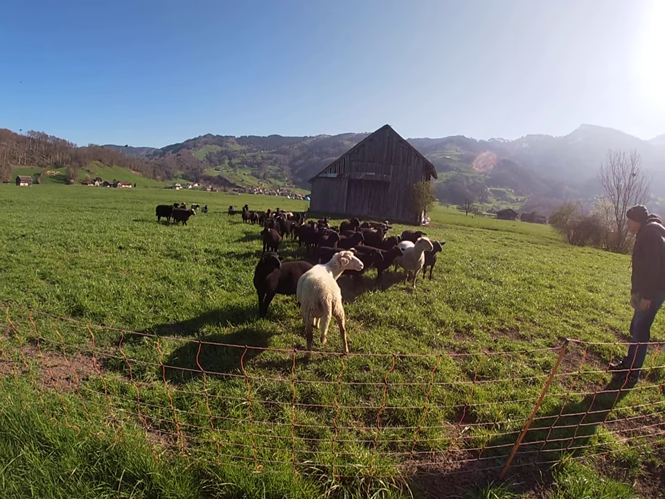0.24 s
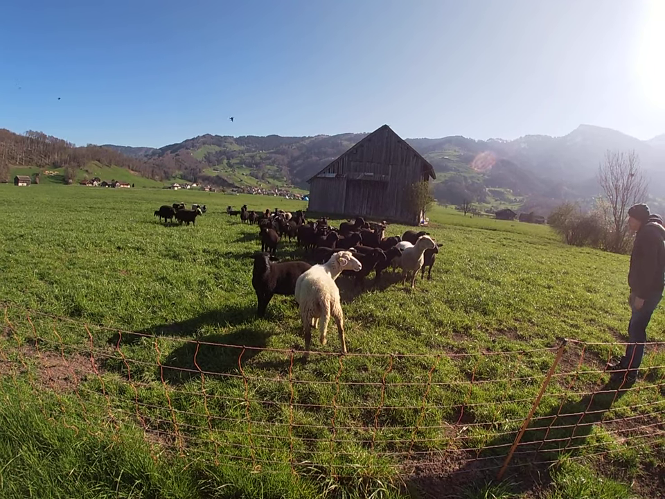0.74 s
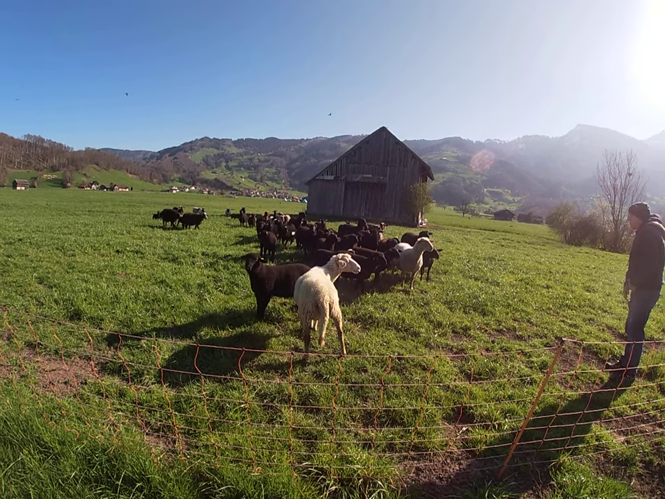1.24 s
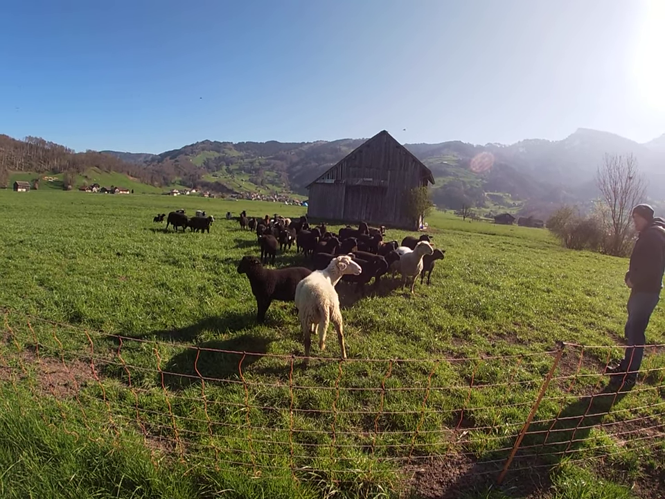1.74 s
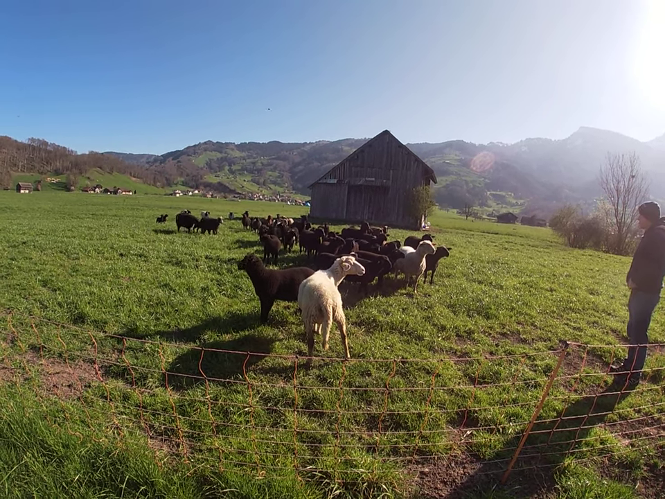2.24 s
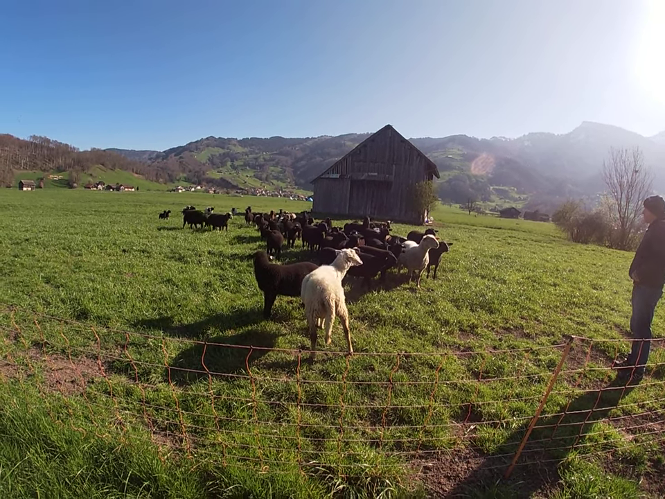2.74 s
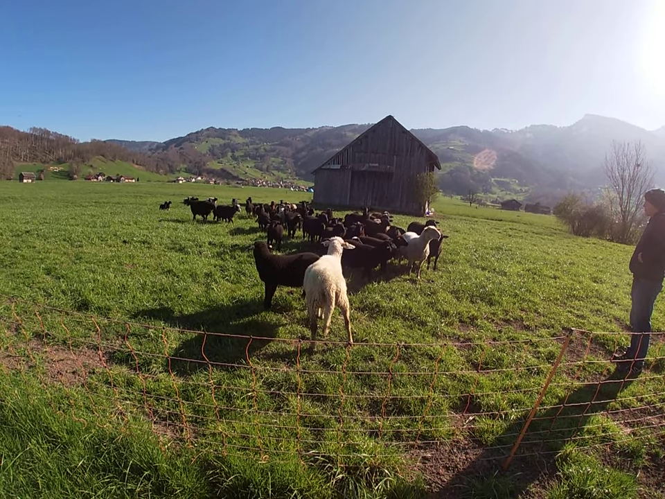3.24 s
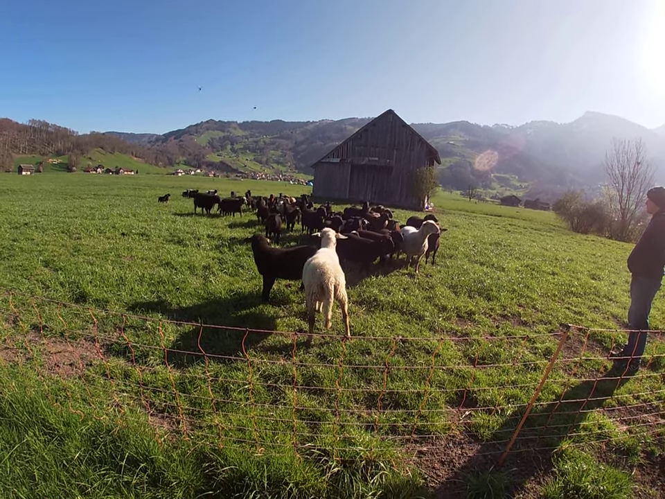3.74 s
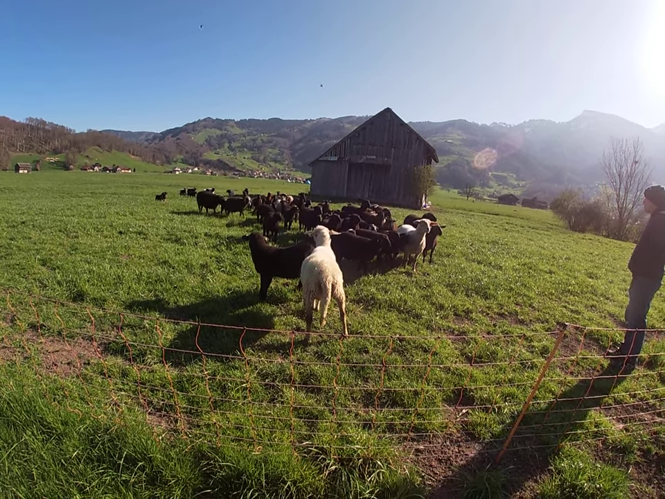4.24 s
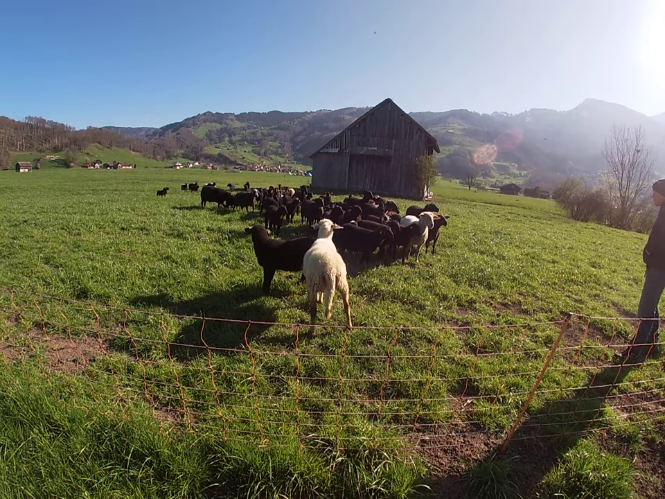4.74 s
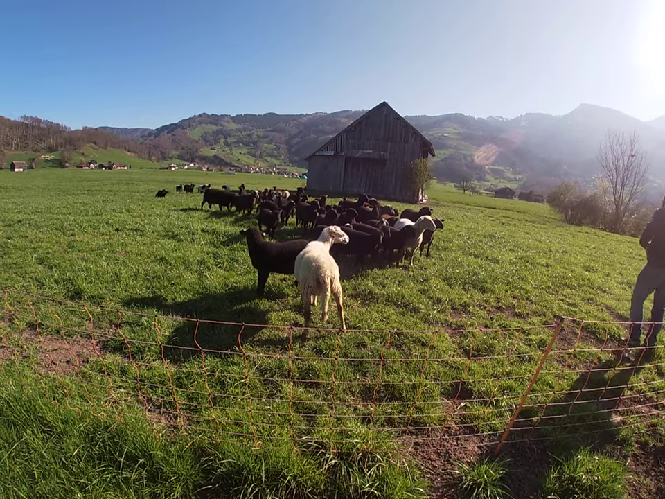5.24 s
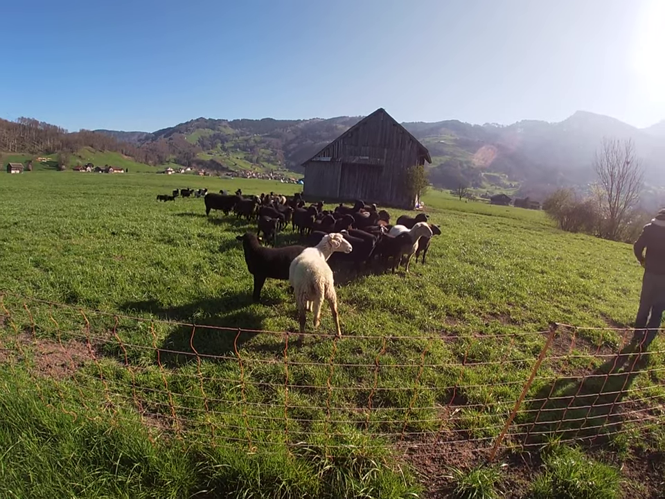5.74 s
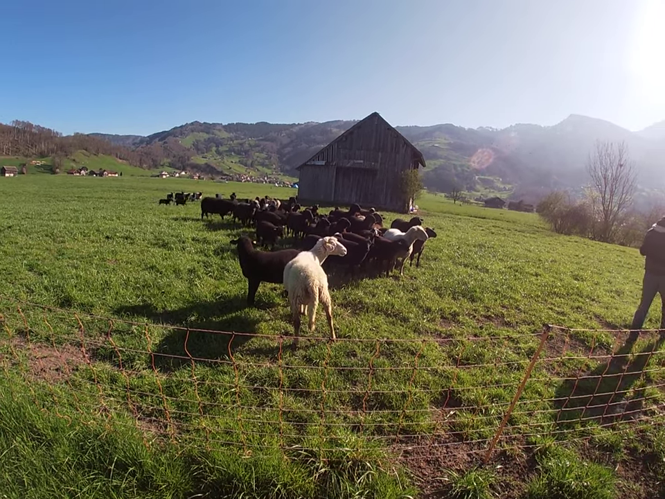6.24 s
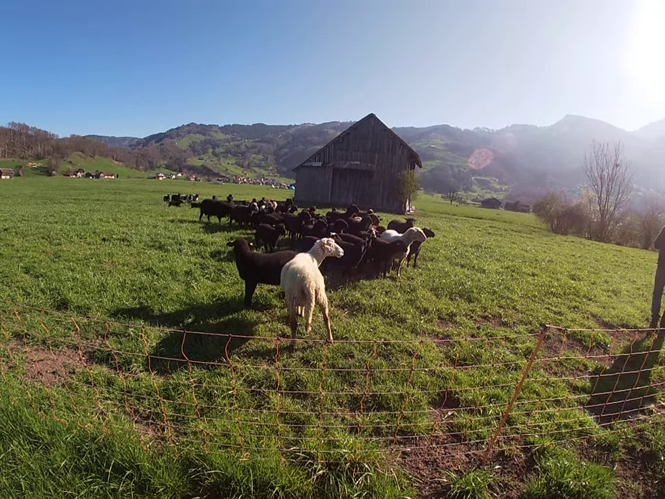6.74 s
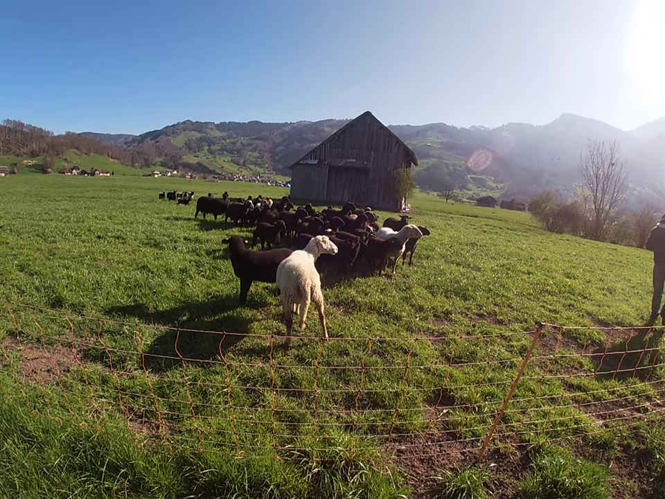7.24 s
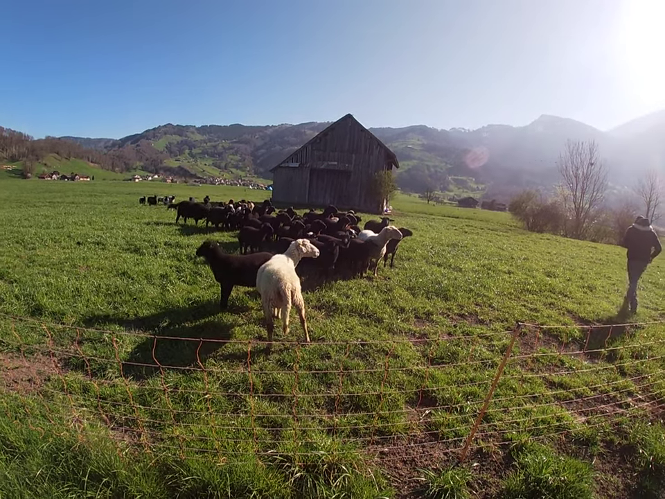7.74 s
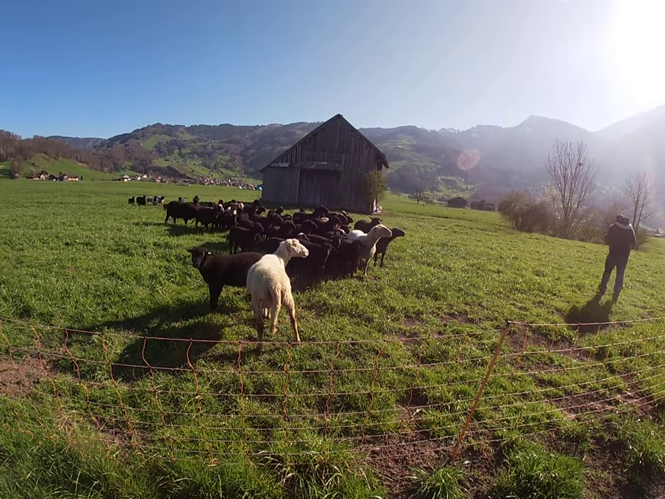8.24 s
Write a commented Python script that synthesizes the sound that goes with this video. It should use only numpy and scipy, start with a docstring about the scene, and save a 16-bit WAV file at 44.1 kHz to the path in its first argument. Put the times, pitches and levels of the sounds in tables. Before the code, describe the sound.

Open pasture, slightly wind-buffeted microphone. A high lamb bleats first, then a cluster of fainter quavering calls, a loud bright lamb, and two low ewes overlapping, one hoarse and one clear. After a pause of birdsong and faint grass rustle, a near ewe starts with a muffled closed-mouth stutter and opens into a strong nasal baa. Small birds rasp and whistle throughout.

```python
"""Light wind buffets the microphone over soft open-air hiss and a faint valley hum; grass swishes and ticks.
Small birds rasp (harsh chains of falling sweeps) and whistle (pure glides) overhead.
Lambs and ewes bleat by turns over an open pasture, one call overlapping the next: vocal-fold pulses
and breath turbulence ring through throat resonances. Wind and grass are shaped noise, the hum is wavering sines."""
import sys
import numpy as np
from scipy import signal
from scipy.fft import rfft, irfft, next_fast_len
from scipy.io import wavfile
from scipy.ndimage import map_coordinates

SR = 44100
rng = np.random.default_rng(int(sys.argv[2]) if len(sys.argv) > 2 else 0)


def output_pcm(signal):
    """Save a mono or channel-first signal as 16-bit PCM at the path in sys.argv[1].

    Samples are clipped to [-1, 1] before scaling.
    """
    pcm = np.clip(np.atleast_2d(signal).T, -1, 1) * 32767
    wavfile.write(sys.argv[1], SR, np.round(pcm).astype(np.int16))


N = 374850
TIME = np.arange(N) / SR

# Bleats by name: start_s, summit_s, end_s, summit_pitch_hz, rise_share, droop_share, level_db (above 500 Hz),
# attack_s, sag_db_per_s, release_s
BLEATS = { "lamb": (.435, .71, 1.06, 434.5, .046, .088, -40, .04, 11, .04),
          "far lamb": (1.71, 1.93, 2.12, 374, .06, .032, -44.5, .45, 0, .01),
          "young ewe": (2.04, 2.32, 2.44, 165, .28, .06, -41.3, .2, 14, .05),
          "answering ewe": (2.415, 2.465, 2.6, 164, .06, .2, -43, .03, 60, .03),
          "low stutter": (2.5, 2.71, 2.73, 269, .125, .06, -45, .01, 10, .01),
          "high stutter": (2.75, 2.77, 2.97, 270, .06, .01, -41, .02, 20, .01),
          "loud lamb": (3.345, 3.544, 3.83, 398.5, .125, .074, -34.2, .105, 42, .03),
          "hoarse ewe": (3.81, 4.06, 4.43, 136, .1, .06, -39.3, .08, 7, .11),
          "clear ewe": (4.25, 4.6, 5.0, 166.8, .105, .128, -40.6, .08, 0, .085),
          "far ewe": (6.12, 6.38, 6.48, 150, .23, .06, -57, .1, 0, .01),
          "near ewe, mouth shut": (6.45, 6.83, 6.95, 178, .12, 0, -39.5, .075, 7, .01),
          "near ewe, lips parting": (6.915, 6.935, 6.975, 179, 0, .12, -35.5, .012, 0, .02),
          "near ewe, mouth open": (6.952, 7.08, 7.32, 171.5, 0, .135, -32.6, .04, 12, .13)}


def amp(db):
    """Decibels to gain."""
    return 10 ** (np.asarray(db) / 20)


def unit(x):
    """Scale to rms 1."""
    return x / np.sqrt(np.mean(x ** 2) + 1e-20)


def along(points, hz):
    """Interpolate (hz, value) points on a log-frequency axis."""
    f, v = np.transpose(points)
    return np.interp(np.log(hz + 1), np.log(f + 1), v)


def curves(rows, t):
    """Interpolate each column after the time column at times t."""
    s, *cols = np.transpose(rows)
    return [np.interp(t, s, c) for c in cols]


def wobble(rate_hz, size=N):
    """Smooth random curve with rate_hz random knots a second."""
    knots = rng.standard_normal(int(size * rate_hz / SR) + 4)
    return map_coordinates(knots, [np.arange(size) * rate_hz / SR], mode="nearest")


def filtered(x, response):
    """Multiply the spectrum of x by response(hz)."""
    m = next_fast_len(len(x) + 8192)
    return irfft(rfft(x, m) * response(np.fft.rfftfreq(m, 1 / SR)), m)[:len(x)]


def noise(spectrum):
    """Coloured noise of rms 1; spectrum is (hz, db) points."""
    return unit(filtered(rng.standard_normal(N), lambda hz: amp(along(spectrum, hz))))


def add(out, s, x):
    """Mix x into out at time s."""
    part = out[max(round(s * SR), 0):][:len(x)]
    part += x[:len(part)]


def wind(rumble_db=0.3, lumps_db=4.4, buffet_db=-2):
    """Eddies roll over the microphone, fluttering more in a flurry; the sharpest land as single soft thumps."""
    # Wind strength: time_s, strength_db
    wind_strength = [(0.0, -34.0), (0.15, -42.0), (0.65, -35.0), (1.72, -53.0), (1.97, -39.0),
                     (3.03, -41.0), (3.16, -47.0), (3.3, -28), (3.65, -39.0), (3.75, -32.0), (4.6, -42.0),
                     (4.85, -35.0), (6.7, -31.0), (6.96, -43.0), (7.08, -31.0), (8.4, -45.0)]
    # Flutter relative to strength: time_s, flutter_db
    flutter_share = [(.7, -17), (1.2, -10.5), (2.7, -8), (3.9, -9), (4.6, -14.5), (8.4, -15)]
    # Spells of fast eddies: middle_s, length_s, level_db
    flurries = [(3.04, .07, -36), (3.45, .3, -42.5), (6.6, .36, -43)]
    # Sharp eddies: time_s (half a cycle before the peak), peak_db (before buffet_db), pitch_hz
    buffets = [(2.009, -21, 55), (3.041, -21, 100), (3.327, -16.5, 40.7), (3.389, -11.5, 75.6),
               (3.434, -20.5, 72.7), (4.062, -18, 66), (6.493, -16.5, 53.3)]
    # Slow-eddy spectrum: freq_hz, level_db
    rumble_spectrum = [(10, -18), (35, 0.5), (80, -7), (120, -20.5), (400, -81)]
    # Fast-eddy spectrum: freq_hz, level_db
    flutter_spectrum = [(50, -52), (105, -3), (170, -6), (330, -25.5), (1200, -74)]

    strength_db, = curves(wind_strength, TIME)
    flutter_db, = curves(flutter_share, TIME)
    eddies = wobble(22)
    rumble = unit(noise(rumble_spectrum) * amp(0.53 * lumps_db * eddies))
    flutter = unit(noise(flutter_spectrum) * amp(lumps_db * eddies))
    flurry = sum(amp(db) * np.exp(-(2 * (TIME - s) / length) ** 4) for s, length, db in flurries)
    out = amp(strength_db + rumble_db) * rumble
    out += (amp(strength_db + flutter_db) + flurry) * flutter
    for s, db, hz in buffets:
        turn = np.linspace(-1, 1, int(2 * SR / hz))  # two cycles
        thump = np.cos(2 * np.pi * turn) * np.cos(np.pi * turn / 2) ** 4
        add(out, s - .5 / hz, amp(db + buffet_db) * thump)
    return out


def valley(air_db=-61):
    """Soft open-air hiss of coloured noise and a faint hum of sines wavering in pitch and level."""
    # Hum tones: freq_hz, level_db
    hum_tones = [(176, -58.5), (350, -70.5)]
    # Hiss spectrum: freq_hz, level_db
    air_spectrum = [(200, -2), (430, -9), (555, -12.5), (768, -5.5), (2400, -15), (5800, -18), (6850, -29),
                    (9000, -68)]

    out = np.zeros(N)
    for hz, db in hum_tones:
        level = amp(db + wobble(3))
        out += level * np.sin(2 * np.pi * np.cumsum(hz * (1 + 0.01204 * wobble(11))) / SR)
    return out + amp(air_db + 2.1 * wobble(4.134)) * noise(air_spectrum)


def grass(grain_db=3, tick_t60_s=0.015, tick_db=-8):
    """Blades brush in grainy swishes of noise; a dry stalk snaps here and there as a short band of noise."""
    # Swish level: time_s, level_db
    swish_level = [(0, -76), (.95, -59), (1.2, -68), (5.6, -59), (5.78, -63), (6.4, -67), (8.3, -70.5),
                   (8.45, -57)]
    # Swish spectrum: freq_hz, level_db
    swish_spectrum = [(1000, -2), (3500, -3), (6000, -4), (10000, -17), (13000, -45)]
    # Dry stalks: start_s, peak_db (before tick_db), centre_hz
    ticks = [(5.0548, -29, 5880), (7.7294, -37, 3030)]

    swish = unit(noise(swish_spectrum) * amp(grain_db * wobble(500)))
    out = amp(curves(swish_level, TIME)[0]) * swish
    t = np.arange(SR // 20) / SR
    for s, db, centre in ticks:
        burst = rng.standard_normal(len(t)) * amp(-60 * t / tick_t60_s)
        snap = filtered(burst, lambda hz: 1 / (1 + ((hz - centre) / (0.34 * centre)) ** 2))
        add(out, s, amp(db + tick_db) * snap / np.abs(snap).max())
    return out


def rasp_notes(first_rasp_db=-2):
    """Unroll runs into even notes, add far birds at random: (start_s, length_s, level_db, pitch_hz, harsh)."""
    # Runs of rasps: start_s, notes, spacing_s, length_s, level_db, pitch_hz, harshness (0-1)
    rasp_runs = [(1.483, 1, 0, .049, -50, 2750, .3), (1.559, 2, .077, .032, -47.5, 2800, .85),
                 (1.833, 3, .059, .032, -49.5, 2800, .9), (2.177, 4, .084, .036, -47, 2750, .9),
                 (2.88, 1, 0, .42, -47.5, 2700, .6), (2.985, 1, 0, .135, -42, 2700, .35),
                 (3.122, 2, .04, .03, -45, 2650, .5), (3.232, 5, .076, .046, -43.5, 2600, .6),
                 (3.995, 1, 0, .069, -54, 2000, .6), (5.051, 1, 0, .13, -46, 1900, .5),
                 (5.271, 2, .22, .07, -55, 1800, .25), (5.9, 1, 0, .09, -55, 1750, .3),
                 (7.45, 3, .07, .06, -58.5, 1750, .35), (8.14, 2, .075, .04, -56, 1700, .3)]
    far_per_s, far_s, far_db, far_hz = 4, .05, -67, 2300  # far birds: rate, middle length, level, middle pitch

    notes = []
    for s, count, spacing, length, db, hz, harsh in rasp_runs:
        for k in range(round(count)):
            # a run starts softly
            notes.append((s + k * spacing, length, db + first_rasp_db * (k == 0), hz, harsh))
    for when, long, high in rng.random((int(far_per_s * N / SR), 3)):
        notes.append((when * N / SR, far_s * (.5 + long), far_db, far_hz * 2 ** ((high - .5) / 2), 1))
    return notes


def whistle_notes():
    """Each whistle is one phrase of upstrokes, a high arch and a lower answer; columns as the phrase."""
    # Whistles: start_s, level_db
    whistles = [(.891, -47.5), (4.535, -50.5), (5.868, -54), (8.034, -51.5)]
    # Phrase: delay_s, length_s, start_hz, middle_hz, end_hz, level_db (relative to the whistle)
    phrase = [(-.022, .022, 4800, 5350, 6000, -10), (0, .042, 3400, 4680, 3450, 0),
              (.051, .015, 4100, 5100, 6100, -8), (.06, .025, 2850, 3100, 3950, -2),
              (.081, .019, 3600, 3120, 2900, -2)]
    return [(s + delay, *note, db + note_db) for s, db in whistles for delay, *note, note_db in phrase]


def rasp(length, hz, harsh, unsteady=.025, wander=.05, overtone_db=(-8, 0, -24)):
    """Chain of falling sweeps with overtones, made harsh by phase buzz at a quarter of the pitch."""
    sweeps_per_s, sweep_fall = 75, .2  # mean rate; fall as a share of hz
    size = int(length * SR)
    fall = np.cumsum(sweeps_per_s * (1 + .5 * wobble(150, size))) / SR % 1
    drift = unsteady * wobble(600, size) + wander * wobble(120, size)
    pitch = hz * (1 + sweep_fall * (1 / 3 - fall ** 2) + drift)
    phase = 2 * np.pi * np.cumsum(pitch) / SR
    phase = phase + harsh * (np.sin(phase / 4) + .27 * wobble(2200, size))
    tone = sum(amp(level) * np.sin(k * phase) for k, level in enumerate(overtone_db, 1))
    swell = np.sqrt(np.sin(np.pi * fall)) * amp(3 * wobble(2 * sweeps_per_s, size))
    return unit(tone * swell) * signal.windows.tukey(size, .4)


def whistle(length, start, middle, end):
    """Pure tone gliding on a parabola through three pitches, slightly unsteady."""
    size = int(length * SR)
    glide = np.polyfit([0, .5, 1], [start, middle, end], 2)
    pitch = np.polyval(glide, np.linspace(0, 1, size))
    phase = 2 * np.pi * np.cumsum(pitch * (1 + .015 * wobble(700, size))) / SR
    return unit(np.sin(phase) * signal.windows.tukey(size, .5))


def birds():
    """Small birds: harsh rasps near and far, and whistled phrases."""
    out = np.zeros(N)
    for s, length, db, hz, harsh in rasp_notes():
        add(out, s, amp(db) * rasp(length, hz, harsh))
    for s, length, start, middle, end, db in whistle_notes():
        add(out, s, amp(db) * whistle(length, start, middle, end))
    return out


def contour(name, t):
    """Pitch arches over a summit, level_db swells, sags and fades; both drop briefly where the voice catches."""
    # Catches: bleat name, time_s, pitch_drop_share
    catches = [("lamb", .438, .155), ("lamb", .49, .1), ("lamb", .935, .025), ("loud lamb", 3.352, .17),
               ("loud lamb", 3.407, .085), ("clear ewe", 4.935, .035), ("near ewe, mouth shut", 6.533, .2),
               ("near ewe, mouth shut", 6.895, .04), ("near ewe, mouth open", 6.975, .08)]
    arch = 1.5  # roundness of the summit (1 = pointed)
    attack_db, release_db = 8, 16  # depth of swell in and fade out
    catch_s, catch_power = .024, 3  # half width; loudness follows this power of the pitch

    start, summit, end, hz, rise, droop, db, attack, sag, release = BLEATS[name]
    before = np.interp(t, [start, summit], [1, 0])
    after = np.interp(t, [summit, end], [0, 1])
    catch = 1 - sum(drop * np.exp(-((t - s) / catch_s) ** 2) for who, s, drop in catches if who == name)
    pitch = hz * (1 - rise * before ** arch - droop * after ** arch) * catch
    fade_in_db = np.interp(t, [start, start + attack], [attack_db, 0])
    fade_out_db = np.interp(t, [end - release, end], [0, release_db])
    sag_db = sag * np.maximum(t - start - attack, 0)
    return pitch, db - fade_in_db - fade_out_db - sag_db + catch_power * 20 * np.log10(catch)


def pulses(times, sizes, size):
    """Sharp pulses at fractional sample times, by windowed sinc."""
    index = np.floor(times)[:, None] + np.arange(-7, 9)
    lag = index - times[:, None]
    shape = np.sinc(lag) * np.cos(np.pi * lag / 16) ** 2
    where = np.clip(index, 0, size - 1).astype(int)
    return np.bincount(where.ravel(), (sizes[:, None] * shape).ravel(), size)


def resonate(x, throat, size=4096):
    """Causal throat colour: each pulse rings on after it strikes; treble falls away past the last point."""
    hz = np.fft.rfftfreq(size, 1 / SR)
    damping = along([(f, amp(-db / 2)) for f, db in throat], hz)  # pointed resonances, broad valleys
    treble_loss = 1 + (hz / throat[-1][0]) ** 8
    bass_loss = 1 + (90 / (hz + 1)) ** 2
    gain = damping ** -2 / treble_loss / bass_loss
    # folded cepstrum gives minimum phase
    cepstrum = irfft(np.log(np.maximum(gain, 3e-4)))
    fold = np.r_[1, np.full(size // 2 - 1, 2), np.zeros(size // 2)]
    # all-pass: sound runs to and fro between folds and lips, spreading each pulse over a few round trips
    round_trip, reflection = np.exp(-2j * np.pi * hz * .0009), .76  # .9 ms
    spread = (reflection + round_trip) / (1 + reflection * round_trip)
    return signal.fftconvolve(x, irfft(spread * np.exp(rfft(cepstrum * fold))))[:len(x)]


def mouth(source, throat, shift, count=9):
    """Throat with all resonances sliding by the factor shift, blended from a few fixed shapes."""
    steps = np.linspace(shift.min() - .001, shift.max() + .001, count)
    out = np.zeros(len(source))
    for step, share in zip(steps, np.eye(count)):
        shape = resonate(source, [(hz * step, db) for hz, db in throat])
        out += np.interp(shift, steps, share) * shape
    return out


def bleat(name, throat, rough, crest=0, quaver_hz=13, quaver_db=0, bend=0, lead=0, gape=0, settle=0,
          follow=0, slide=0, ragged=0, waver=.003):
    """Vocal-fold pulses and breath puffs through the throat, with an optional quaver.

    The quaver crests at crest (s) and swings level, pitch (share bend, lead radians early) and
    resonances (share gape); its depth decays at settle per s. Resonances also follow the pitch to the
    power follow and slide up into place (share per s). ragged adds roughness and a stumbling pitch
    while the voice is unsettled; waver is the random unsteadiness of pitch."""
    slack, slack_db = .04, 12  # resonances sink by this share once the call has faded this far

    start, _, end, summit_hz, *_ = BLEATS[name]
    t = np.arange(start - .01, end + .01, 1 / SR)
    pitch, level_db = contour(name, t)
    swing = 2 * np.pi * quaver_hz * (t - crest)
    quaver = np.cos(swing)
    depth = np.exp(-settle * (t - t[0]))
    effort_db = level_db - quaver_db * depth * (.5 - .5 * quaver) ** 2
    pitch = pitch * (1 + bend * depth * np.cos(swing + lead))
    unsettled = ragged * depth ** 2
    stumble = waver * wobble(45, len(t)) + .08 * unsettled * wobble(150, len(t))
    cycles = np.cumsum(pitch * (1 + stumble)) / SR
    closures = np.interp(np.arange(1, int(cycles[-1])), cycles, np.arange(len(t)))

    # a rough voice closes its folds less evenly and lets out a puff of turbulence at each cycle
    timing, strength = rng.standard_normal((len(closures), 2)).T
    rough = rough + unsettled
    uneven = rough[closures.astype(int)]
    jitter = .012 * uneven * SR / pitch.mean() * timing
    folds = pulses(closures + jitter, amp(5 * uneven * strength), len(t))
    puffs = rng.standard_normal(len(t)) * np.exp(-4 * (cycles % 1))
    source = unit(folds) + rough * unit(puffs)

    # the jaw drops with effort: resonances sink when the call slackens
    jaw = 1 - slack * np.clip((level_db.max() - level_db) / slack_db, 0, 1)
    shift = jaw * np.exp(slide * (t - end)) * (pitch / summit_hz) ** follow * (1 + gape * depth * quaver)
    voice = mouth(source, throat, shift)
    carrying = np.std(filtered(voice, lambda hz: hz > 500))
    edges = np.clip(np.minimum(t - t[0], t[-1] - t) / .02, 0, 1)
    out = np.zeros(N)
    add(out, t[0], voice / carrying * edges * amp(effort_db))
    return out


def lambs():
    """High, clean voices; some quaver or break into a stutter."""
    # Throat and mouth resonances and valleys, all five: freq_hz, level_db
    lamb_throat = [(430, -19), (870, -10), (1300, -9.5), (1750, -12.5), (2200, -6.5), (2600, -14),
                   (3000, -5), (3480, -1.5), (3900, -15), (4350, -10.5), (6300, -22), (9000, -40)]
    far_throat = [(740, -33), (1120, 2), (1500, -11), (1900, -23), (2550, -12), (3300, -20), (5500, -15)]
    stutter_low_throat = [(270, -2), (550, -27), (1500, -3), (1900, -18), (2550, 4), (3300, -11),
                          (4000, -22), (5500, -19)]
    stutter_high_throat = [(800, -16), (1300, -27.5), (2100, -9), (2650, -15), (3050, 5), (3700, -8),
                           (4400, -20), (5500, -17)]
    loud_throat = [(400, -39), (790, -18), (1570, -17.5), (2350, 1), (2780, -10.5), (3480, -2), (3900, -12),
                   (4300, -9), (6200, -17), (7000, -29), (10000, -40.5)]
    clean, husky = .08, .2  # roughness

    return (bleat("lamb", lamb_throat, clean, settle=9, ragged=.3, waver=.005)
            + bleat("far lamb", far_throat, clean, crest=2.095, quaver_hz=13.3, quaver_db=8, bend=.02)
            + bleat("low stutter", stutter_low_throat, husky, crest=2.612, quaver_hz=12.1, quaver_db=14,
                    bend=.05, follow=.3)
            + bleat("high stutter", stutter_high_throat, husky, crest=2.858, quaver_hz=12.2, quaver_db=20,
                    bend=.022, follow=.3)
            + bleat("loud lamb", loud_throat, clean, crest=3.73, quaver_hz=15.5, bend=.002, settle=-4))


def ewes():
    """Low voices; the nearest starts with a ragged stutter, mouth shut, steadies, parts its lips, opens wide."""
    # Throat and mouth resonances and valleys, all seven: freq_hz, level_db
    young_throat = [(165, 5), (500, -22), (940, 2), (1550, -6), (2010, 8), (2250, -3), (2750, -6),
                    (4050, -22), (5250, -7), (6400, -27), (8600, -23)]
    answering_throat = [(600, -22), (1170, 0), (1550, -14), (2100, 3), (2500, -8), (3050, -5), (6000, -20)]
    hoarse_throat = [(260, 2), (420, -21), (595, 13), (800, -11), (1250, -9), (1440, 7), (1850, 2),
                     (2140, 12), (2420, -1), (2850, -17), (7000, -29)]
    clear_throat = [(160, 3), (460, -17), (670, 0), (850, -11.5), (1150, -7), (1300, 0), (1570, -24),
                    (2050, -8.5), (2800, -26), (3750, -23), (4200, -46), (6300, -44), (6950, -33),
                    (7500, -52)]
    closed_throat = [(190, 21.5), (350, -12), (520, -12), (730, 7), (1200, -16), (1680, -3), (2560, 4),
                     (3150, -22), (4350, -1), (4900, -30), (5500, -12), (6000, -15), (6600, -40),
                     (11000, -42)]
    parting_throat = [(400, -10), (760, 4), (1400, -7), (3400, -12), (4500, 4), (5200, -15), (5900, -11)]
    open_throat = [(170, 5), (400, -13), (690, 4), (860, -2), (1030, 1), (1400, -12), (1920, -1),
                   (2250, -8), (2600, 3), (2830, -13), (3150, -3), (3600, -20), (4400, -5), (4800, -6),
                   (5050, -27), (5300, -8), (5750, -6), (6800, -42), (7500, -22), (9700, -40), (12500, -32)]
    clean, husky, hoarse = .11, .25, .34  # roughness

    return (bleat("young ewe", young_throat, husky, crest=2.31, quaver_hz=12.5, quaver_db=5, bend=.045,
                  lead=-.4, gape=.01, slide=.1, waver=.02)
            + bleat("answering ewe", answering_throat, hoarse, follow=.3, waver=.025)
            + bleat("hoarse ewe", hoarse_throat, hoarse, crest=3.985, quaver_hz=13.4, quaver_db=9, bend=-.07,
                    gape=-.065, slide=.12, settle=3.2, ragged=.1, waver=.025)
            + bleat("clear ewe", clear_throat, clean, follow=.15)
            + bleat("far ewe", young_throat, hoarse)
            + bleat("near ewe, mouth shut", closed_throat, clean, crest=6.574, quaver_hz=12.4, quaver_db=19,
                    bend=.13, lead=.6, gape=-.05, settle=4.6, ragged=1, waver=.006)
            + bleat("near ewe, lips parting", parting_throat, husky, slide=1.1)
            + bleat("near ewe, mouth open", open_throat, clean, crest=7.022, quaver_hz=12.5, quaver_db=2,
                    bend=.011, follow=.15))


def field(x, t60_s=.4):
    """Thin scatter from the ground, the flock and the barn: convolution with decaying noise."""
    t = np.arange(SR // 2) / SR
    tail = rng.standard_normal(len(t)) * amp(-60 * t / t60_s)
    return signal.fftconvolve(x, tail / np.linalg.norm(tail))[:N]


def blip(s=5.085, length_s=.04, hz=870, db=-52):
    """One soft, low windowed sine under the birds' chatter."""
    t = np.arange(int(length_s * SR)) / SR
    out = np.zeros(N)
    add(out, s, amp(db) * unit(np.sin(2 * np.pi * hz * t) * np.hanning(len(t))))
    return out


def scene():
    """Flock and birds in the open, with wind at the microphone."""
    flock, song = lambs() + ewes(), birds()
    scatter = field(amp(-19) * flock + amp(-14) * song)
    return (wind() + valley() + grass() + song + flock + scatter + blip())[None]


def record(dry, top_hz=13300):
    """Band limit: nothing is kept from top_hz up."""
    return np.array([filtered(x, lambda hz: hz < top_hz) for x in dry])


dry = scene()
out = record(dry)
output_pcm(out)
```